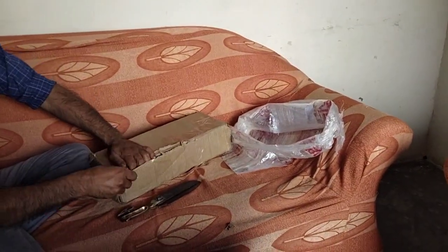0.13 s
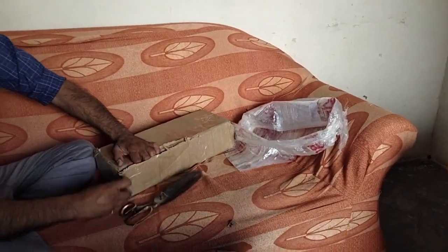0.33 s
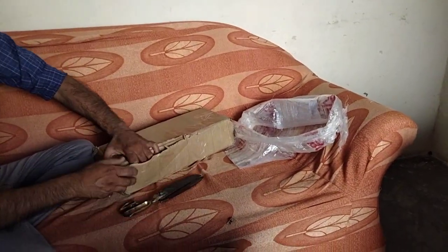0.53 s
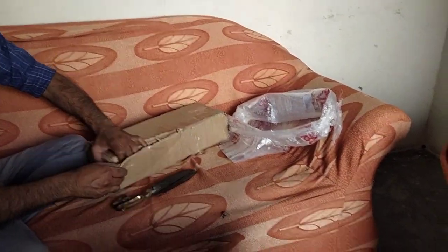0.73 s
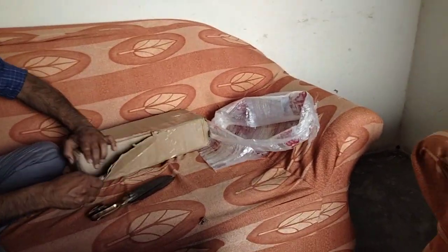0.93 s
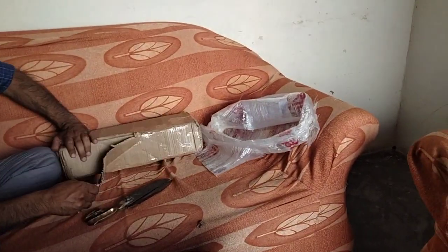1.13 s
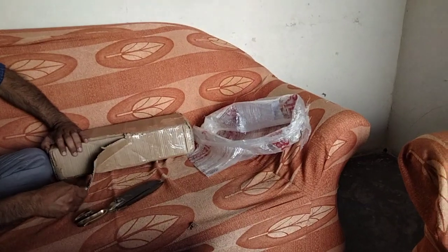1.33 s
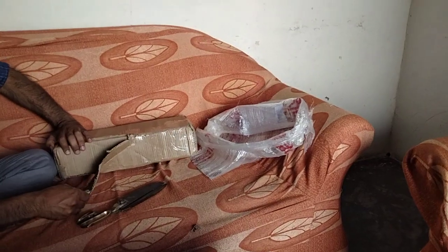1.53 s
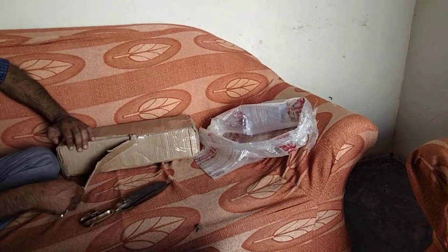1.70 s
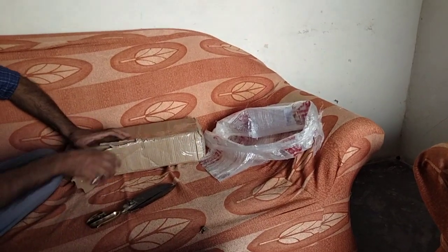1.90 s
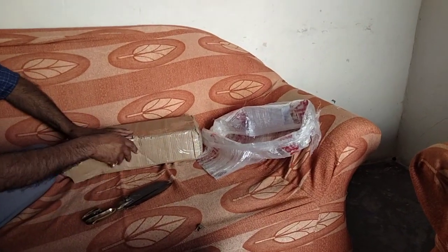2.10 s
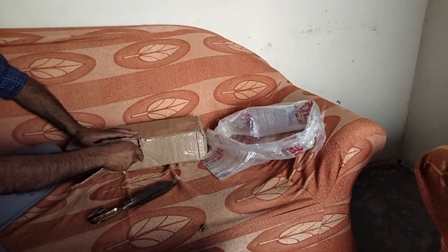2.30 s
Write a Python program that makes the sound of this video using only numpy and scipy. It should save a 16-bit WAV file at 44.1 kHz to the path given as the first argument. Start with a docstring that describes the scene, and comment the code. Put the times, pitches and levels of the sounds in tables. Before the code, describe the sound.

A cardboard box is torn open by hand. Faint rustling and tape ticks lead to a short, hollow rip at 0.2 s, then a loud, bright tape snap at 0.44 s. Rustling swells into a crunchy tear and board buckle at 0.92-1.07 s. Soft scrapes follow, with light rustling and low cushion bumps near 1.8-2.0 s and final ticks around 2.27 s. Small, quiet, bare-walled room, short reverberation.

```python
"""A tick of tape over faint rustling comes first, then hands pull open a taped cardboard box on a sofa.
The board rips in short runs of breaking fibres, each a tiny impulse, that also ring the hollow box.
The tape snaps loudly once and ticks as it flexes: a noise crack plus short bright ringing.
Hands and flaps rustle and scrape in random tiny slips, and the box bumps softly in low, short tones.
Around it is a small, quiet, bare-walled room with near echoes, a short tail and steady background noise."""
import sys
import numpy as np
from scipy import signal
from scipy.fft import rfft, irfft, next_fast_len
from scipy.io import wavfile

SR = 44100
rng = np.random.default_rng(int(sys.argv[2]) if len(sys.argv) > 2 else 0)


def master_out(mix):
    """Clip the mix to full scale and print it as 16-bit PCM to the path in sys.argv[1]."""
    frames = np.transpose(np.atleast_2d(mix))
    ceiling = np.clip(frames, -1, 1)
    pcm = np.round(ceiling * 32767).astype(np.int16)
    wavfile.write(sys.argv[1], SR, pcm)


N = 103635  # length of the scene in samples

# Runs of tearing. Each row: start in seconds, length in seconds, level in dB,
# then the dull papery part and the hollow box part, both in dB relative to that level.
TEARING_RUNS = [(.2062, 0.0021, -49, -6, 1), (0.209, .004, -39, -7.5, -4), (0.218, 0.0055, -36.5, -3, -10),
                (0.229, 0.03, -42.5, -6.5, -12.5), (0.262, 0.049, -52, -13, -31),
                (.921, 0.014, -58.5, 8.5, -16), (0.9346, 0.003, -38.5, 0.5, -29),
                (0.94, 0.015, -45, 2.5, -6.5), (0.971, 0.028, -56, 8, 3.5), (1.009, 0.027, -41, -2.5, -1),
                (1.033, 0.014, -39.5, -13.5, -9), (1.048, 0.017, -44.5, 0, -15)]
# Bright part of the breaking fibres. Each row: frequency in Hz, relative level in dB.
CRISP_COLOUR = [(80, -46), (400, -21), (900, -23), (2500, -28), (3800, -3.5), (5000, -9.5), (6800, 0),
                (8200, 2), (10000, -5), (11300, -12.5), (12500, -14), (14000, -5), (15800, -21.5)]
# Dull part, heard through the board. Each row: frequency in Hz, relative level in dB.
PAPERY_COLOUR = [(80, -21), (200, -6.5), (480, -13.5), (680, -21), (880, -0.5), (1250, -6), (1750, -1),
                 (2400, -2), (3800, -4.5), (6000, -12), (15000, -17.5)]
FIBRES_PER_S, FIBRE_SPREAD_DB = 2600, 1
RIP_RELEASE_S = 0.0025  # time constant of the fade after each run


def rips():
    """Each run breaks a shower of fibres that sound directly, through the board and in the hollow box."""
    t = np.arange(N) / SR
    fibres = np.zeros((3, N))  # crisp, papery and box parts
    showers = np.array([grains(FIBRES_PER_S, FIBRE_SPREAD_DB) for _ in fibres])
    for start, length, db, papery_db, box_db in TEARING_RUNS:
        pull = (t >= start) * np.exp(-np.maximum(t - start - length, 0) / RIP_RELEASE_S)
        run = showers * pull
        # give every run the same energy as its envelope, however its fibres fell
        run *= np.linalg.norm(pull) / np.linalg.norm(run, axis=1, keepdims=True)
        fibres += run * amp([[db], [db + papery_db], [db + box_db]])
    crisp, papery, box = fibres
    return coloured(crisp, CRISP_COLOUR) + coloured(papery, PAPERY_COLOUR) + box_ring(box)


# Resonances of the box while shut. Each row: frequency in Hz, width in Hz, relative level in dB.
SHUT_BOX = [(453, 90, -1.5), (850, 23, 4.5), (1435, 25, -7), (1725, 62, 1), (1822, 39, 6), (2390, 23, -11)]
# Resonances with the flap lifted, also used by the scrapes.
# Each row: frequency in Hz, width in Hz, relative level in dB.
LIFTED_BOX = [(333.4, 38, 6), (920, 17, 8.5), (981, 90, -2.5), (1327, 57, -2), (1420, 25, -6.5),
              (1676, 40, -0.5)]
OPENS_S = 0.6


def box_ring(x):
    """The hollow box rings at one set of pitches while shut and at another once its flap is lifted."""
    is_open = np.arange(N) / SR >= OPENS_S
    return hollow(x * ~is_open, SHUT_BOX) + hollow(x * is_open, LIFTED_BOX)


# When the board buckles. Each row: start in seconds, level in dB.
BOARD_BUCKLES = [(1.0063, -28)]
# Ringing of the board. Each row: frequency in Hz, relative level in dB, time to fall 60 dB in seconds.
BOARD_MODES = [(1170, 1.5, 0.011), (1520, 5.5, 0.0065), (2880, -27, .008)]


def buckles():
    """A buckle of the board sets off a few of its damped modes."""
    out, t = np.zeros(N), np.arange(SR // 20) / SR
    for start, db in BOARD_BUCKLES:
        add(out, start, amp(db) * ring(BOARD_MODES, t))
    return out


# Snaps and ticks of the tape. Each row: start in seconds, level in dB, treble tilt in dB per octave.
TAPE_SNAPS = [(.003, -40.5, -9.5), (.1035, -49.5, 10), (.171, -39.5, -3), (.1848, -47, 8), (0.296, -49, -2),
              (0.3074, -32, -8.5), (.396, -33.5, 1), (0.4358, -11, -0.5), (.5315, -32, 3.5),
              (.839, -39, -6.5), (.868, -41.5, -9.5), (1.2935, -42.5, 4), (1.877, -38, 6), (2.2608, -46, 6),
              (2.2812, -34.5, -3)]
# Ringing of taut tape. Each row: frequency in Hz, relative level in dB, time to fall 60 dB in seconds.
TAPE_MODES = [(2030, -31, 0.011), (3600, -16.5, 0.0078), (4500, -17, .009), (5715, -19, 0.016),
              (6670, -12, 0.0054), (8120, -5.5, .008), (9180, -9, 0.0063), (10274, -8, 0.0092),
              (13400, -17, 0.0075), (14700, -11, 0.0043)]
# Colour of the crack before tilting. Each row: frequency in Hz, relative level in dB.
CRACK_COLOUR = [(300, -29.5), (2000, -18.5), (3800, -8.5), (5200, 5), (6500, -15), (8500, -32), (10500, 11),
                (12000, -6), (15000, 1.5)]
CRACK_DB, CRACK_T60_S = -13, 0.013  # level relative to the snap, time to fall 60 dB
TILT_PIVOT_HZ = 8000


def tape():
    """Every snap is a brief crack and a few milliseconds of bright ringing, some brighter than others."""
    out, t = np.zeros(N), np.arange(SR // 20) / SR
    for start, db, tilt_db in TAPE_SNAPS:
        colour = [(hz, level + tilt_db * np.log2(hz / TILT_PIVOT_HZ)) for hz, level in CRACK_COLOUR]
        noise = rng.choice([-1, 1], len(t))
        crack = coloured(amp(CRACK_DB - 60 * t / CRACK_T60_S) * noise, colour)
        add(out, start, amp(db) * (ring(TAPE_MODES, t, tilt_db) + crack))
    return out


# Loudness of sliding hands and flaps, joined by straight lines. Each row: time in seconds, level in dB.
RUSTLE_LEVEL = [(0, -59), (.05, -59), (.15, -68), (.2, -54), (.33, -55), (.38, -64), (0.409, -54),
                (.47, -52.5), (.6, -61.5), (.665, -66), (0.689, -53), (0.781, -61), (.87, -52),
                (1.0, -43.5), (1.12, -53.5), (1.229, -59.5), (1.29, -61), (1.34, -66), (1.44, -66),
                (1.48, -75.5), (1.58, -63), (1.63, -68.5), (1.68, -61.5), (1.79, -64.5), (1.824, -53.5),
                (1.96, -56.5), (2.03, -64.5), (2.08, -61.5), (2.23, -65.5), (2.285, -49), (2.35, -69)]
# Colour of the rubbing. Each row: frequency in Hz, relative level in dB.
RUB_COLOUR = [(150, -13), (450, 3), (700, -7.5), (1200, -5.5), (2500, -9.5), (4800, -12.5), (6500, -4.5),
              (8200, 3), (10000, -5.5), (11800, -10.5), (15000, -5)]
RUBS_PER_S, RUB_SPREAD_DB = 7900, 5  # the scrapes share this spread


def rustle():
    """Skin and flaps slide over the board in dense tiny slips."""
    level_db = np.interp(np.arange(N) / SR, *np.transpose(RUSTLE_LEVEL))
    return coloured(grains(RUBS_PER_S, RUB_SPREAD_DB) * amp(level_db), RUB_COLOUR)


# A loose flap scrapes the board. Each row: middle in seconds, length in seconds, level in dB.
FLAP_SCRAPES = [(0.017, 0.038, -63), (1.123, 0.22, -65), (1.286, 0.12, -66.5), (1.382, 0.068, -64),
                (1.565, .04, -71), (1.959, 0.082, -63.5), (2.267, 0.026, -65)]
# Colour of the scraping. Each row: frequency in Hz, relative level in dB.
SCRAPE_COLOUR = [(100, -3.5), (330, -6.5), (520, -1.5), (750, -9.5), (1300, -6), (2200, -11.5),
                 (4000, -16.5), (12000, -27)]
SLIPS_PER_S, SCRAPE_BOX_DB = 900, -4.5  # the box part is relative to the direct part


def scrapes():
    """Slower, duller slips of board on board, heard directly and through the box."""
    loudness = sum(amp(db) * swell(middle, length) for middle, length, db in FLAP_SCRAPES)
    slips = grains(SLIPS_PER_S, RUB_SPREAD_DB) * loudness
    return coloured(slips, SCRAPE_COLOUR) + amp(SCRAPE_BOX_DB) * hollow(slips, LIFTED_BOX)


# Soft bumps of the box on the cushion.
# Each row: middle in seconds, length in seconds, pitch in Hz, level in dB.
CUSHION_BUMPS = [(0.301, 0.046, 61.4, -51), (.4, 0.22, 50.4, -60.5), (0.546, .03, 35, -51),
                 (0.652, 0.084, 26, -54.5), (1.102, 0.19, 36, -58), (1.843, 0.28, 25, -58),
                 (1.913, 0.023, 64, -54.5), (1.964, 0.028, 58, -53), (2.015, 0.023, 34, -48.5)]


def bumps():
    """Low, padded pushes: each is a sine wave that swells and fades smoothly."""
    t = np.arange(N) / SR
    return sum(amp(db) * swell(middle, length) * np.sin(2 * np.pi * hz * (t - middle))
               for middle, length, hz, db in CUSHION_BUMPS)


# Colour of the quiet room's background. Each row: frequency in Hz, relative level in dB.
AIR_COLOUR = [(15, 6.5), (40, -11), (75, -6), (150, -4.5), (260, -7.5), (330, -3.5), (385, -10),
              (500, -4.5), (700, -12.5), (1100, -14.5), (1330, -9), (1550, -16.5), (2300, -17.5),
              (4500, -28.5), (8200, -34), (12000, -48), (15500, -25)]
AIR_DB = -61


def room_air():
    """The quiet room's steady background is coloured noise at a fixed level."""
    return amp(AIR_DB) * unit(coloured(rng.standard_normal(N), AIR_COLOUR))


# Echoes from the near walls. Each row: delay in seconds, spread in seconds, level in dB.
WALL_ECHOES = [(0.0154, 0.0036, -6), (.032, 0.0035, -22.5)]
# How long the tail lasts. Each row: frequency in Hz, time to fall 60 dB in seconds.
TAIL_T60 = [(150, 0.34), (1500, 0.26), (5000, 0.3), (9000, 0.22), (15000, 0.21)]
TAIL_DB, TAIL_RISE_S = -7.5, 0.009  # level before the wet gain, time constant of the build-up


def in_room(x, wet_db):
    """The sound, its smeared echoes from the near walls and a short tail that fades at its own rate per pitch."""
    t = np.arange(SR // 2) / SR
    hz, times, bands = signal.stft(rng.standard_normal(len(t)), SR, nperseg=256)
    fading = bands * amp(-60 * times / along(TAIL_T60, hz)[:, None])
    tail = signal.istft(fading, SR, nperseg=256)[1][:len(t)]
    tail *= 1 - np.exp(-t / TAIL_RISE_S)
    answer = amp(TAIL_DB) * tail / np.linalg.norm(tail)
    for delay, spread, db in WALL_ECHOES:
        echo = rng.standard_normal(len(t)) * np.exp(-((t - delay) / spread) ** 2)
        answer += amp(db) * echo / np.linalg.norm(echo)
    return x + amp(wet_db) * signal.fftconvolve(x, answer)[:N]


def amp(db):
    """Decibels to gain."""
    return 10 ** (np.asarray(db) / 20)


def unit(x):
    """Scale to rms 1."""
    return x / np.sqrt(np.mean(x ** 2) + 1e-20)


def along(points, hz):
    """Read a curve of (Hz, value) points on a log frequency axis."""
    f, v = np.transpose(points)
    return np.interp(np.log(hz + 1), np.log(f + 1), v)


def swell(middle, length):
    """A smooth bell-shaped rise and fall around its middle, both in seconds."""
    return np.exp(-(2 * (np.arange(N) / SR - middle) / length) ** 2)


def filtered(x, response):
    """Filter x by a complex response of frequency."""
    m = 2 * next_fast_len(len(x))
    return irfft(rfft(x, m) * response(np.fft.rfftfreq(m, 1 / SR)), m)[:len(x)]


def coloured(x, points):
    """Causal filter through (Hz, dB) points that keeps the power of white noise."""
    def response(hz):
        # folding the cepstrum forward in time leaves no sound before its cause
        cepstrum = irfft(np.log(unit(amp(along(points, hz)))))
        half = len(cepstrum) // 2
        cepstrum[1:half] *= 2
        cepstrum[half + 1:] = 0
        return np.exp(rfft(cepstrum))
    return filtered(x, response)


def grains(per_s, spread_db):
    """Tiny impulses at random times, a few bigger than the rest; rms 1."""
    size = amp(spread_db * np.minimum(rng.exponential(size=N), np.pi))
    happens = rng.random(N) < per_s / SR
    return unit(happens * size * rng.choice([-1, 1], N))


def hollow(x, resonances):
    """Pass x through resonances of alternating sign, keeping the power of white noise."""
    def response(hz):
        h = 0
        for k, (centre, width, db) in enumerate(resonances):
            damping = 1j * hz * width
            h = h + (-1) ** k * amp(db) * damping / (centre ** 2 - hz ** 2 + damping)
        return h / np.sqrt(np.mean(abs(h) ** 2))
    return filtered(x, response)


RISE_CYCLES = 0.7  # time constant of a mode's build-up, in its own cycles


def ring(modes, t, tilt_db=0):
    """Damped modes that build up over a cycle or so, tilted about the mean of their frequencies."""
    centre = np.mean([mode[0] for mode in modes])
    out = np.zeros(len(t))
    for k, (hz, db, t60) in enumerate(modes):
        decay = amp(db + tilt_db * np.log2(hz / centre) - 60 * t / t60)
        rise = 1 - np.exp(-t * hz / RISE_CYCLES)
        out += (-1) ** k * decay * rise * np.sin(2 * np.pi * hz * t)
    return out


def add(track, start, sound):
    """Mix a sound into the track at a start time in seconds."""
    part = track[max(round(start * SR), 0):][:len(sound)]
    part += sound[:len(part)]


def scene():
    """All the handling in the room, with the bumps and the steady background added dry."""
    air = room_air()
    board = in_room(rips() + buckles() + rustle() + scrapes(), wet_db=0)
    snaps = in_room(tape(), wet_db=-0.5)
    return (board + snaps + bumps() + air)[None]


TOP_HZ = 15800


def record(dry):
    """The recorder keeps almost nothing above its band limit, a very steep cut."""
    return filtered(dry[0], lambda hz: 1 / np.sqrt(1 + (hz / TOP_HZ) ** 600))[None]


dry = scene()
out = record(dry)
master_out(out)
```